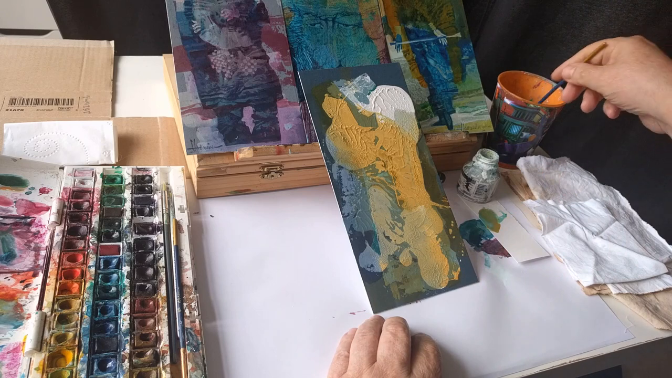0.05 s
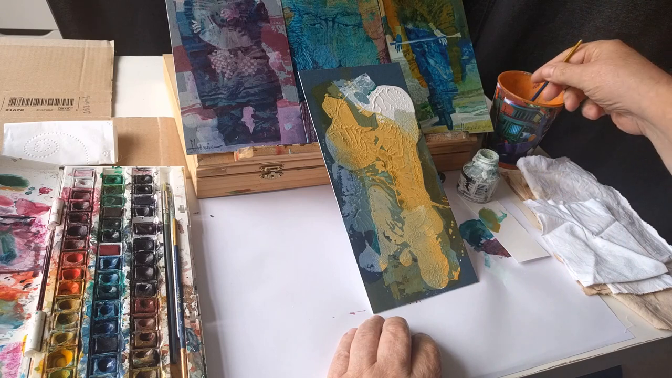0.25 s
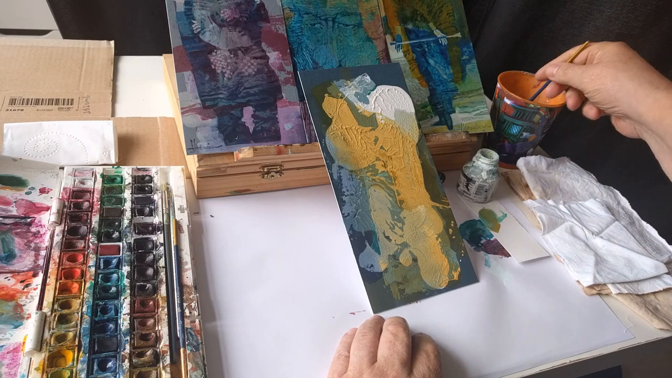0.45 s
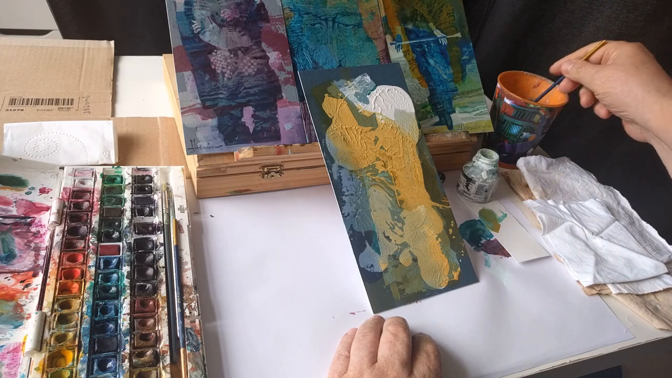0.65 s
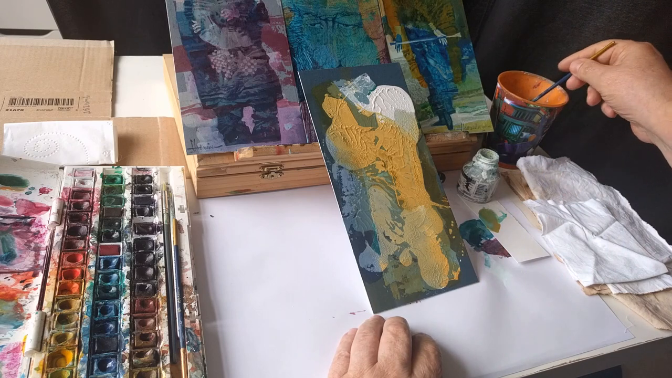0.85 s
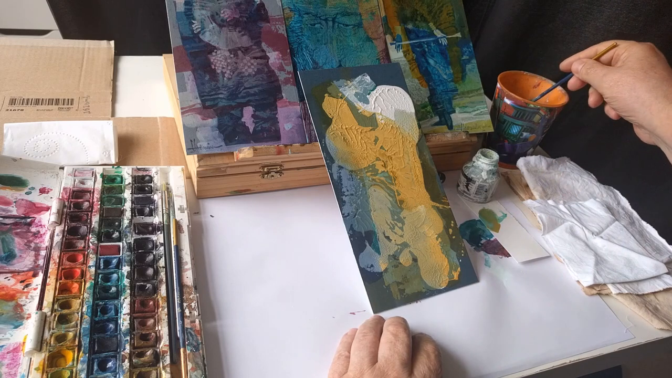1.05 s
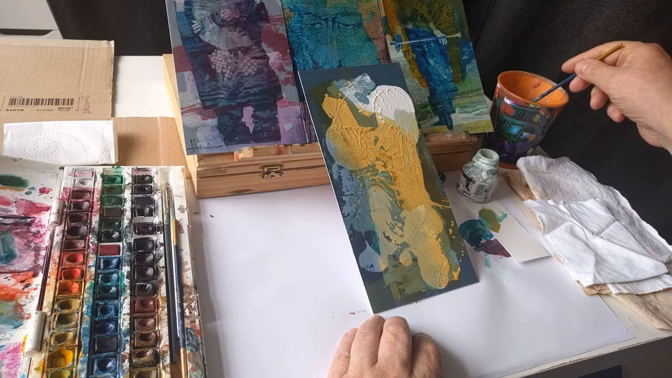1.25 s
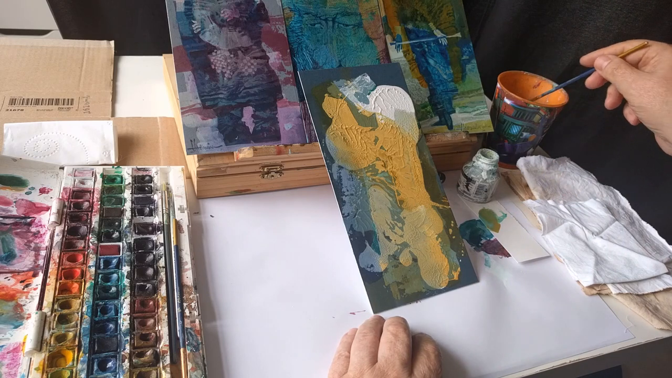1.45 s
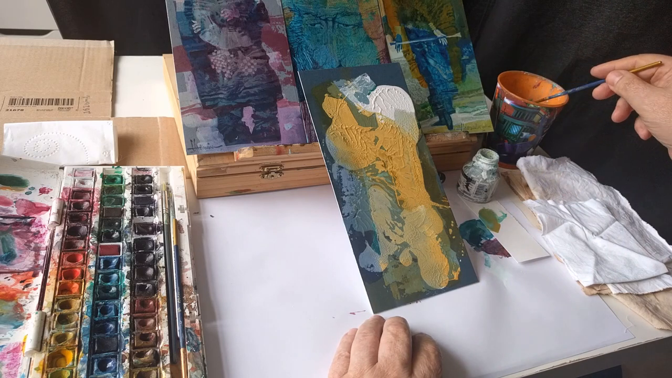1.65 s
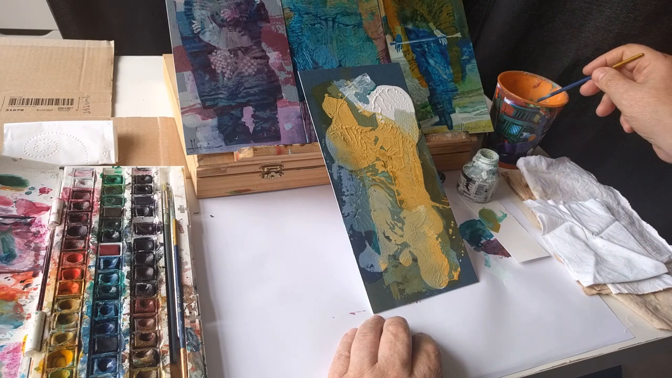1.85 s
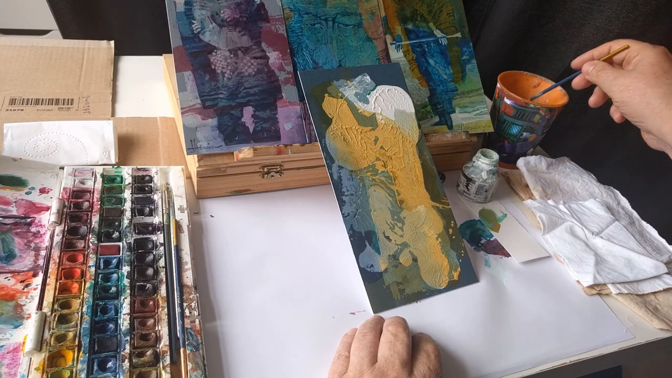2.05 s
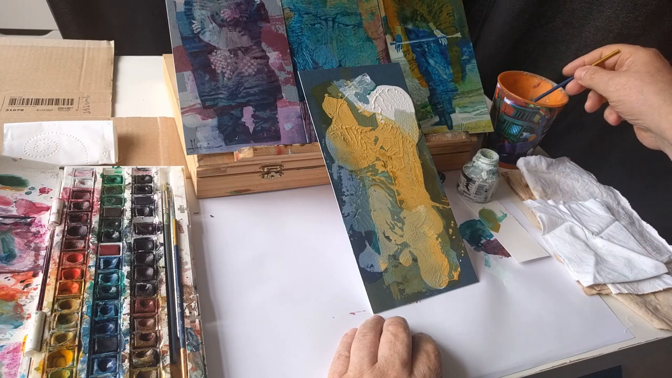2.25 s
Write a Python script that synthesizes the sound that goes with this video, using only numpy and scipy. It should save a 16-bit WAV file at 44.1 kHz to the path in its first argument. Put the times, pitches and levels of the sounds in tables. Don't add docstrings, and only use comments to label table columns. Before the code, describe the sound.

Close phone microphone in a small, reflective room: the brush's metal collar clinks the cup three times, then stirring brings plops, drips, fine fizz and faint knocks, over soft hiss and low hum.

```python
import sys
import numpy as np
from scipy import signal
from scipy.io import wavfile
from scipy.ndimage import uniform_filter1d

SR = 44100
rng = np.random.default_rng(int(sys.argv[2]) if len(sys.argv) > 2 else 0)


def dump_mix(stems):
    frames = np.atleast_2d(stems).T
    limited = np.clip(frames, -1, 1)
    pcm = np.round(limited * 32767).astype(np.int16)
    wavfile.write(sys.argv[1], SR, pcm)


def invert_db(level):
    return 10 ** (np.asarray(level, dtype=float) / 20)


N = 101430
SHELF_HZ = 15850


def evened(x):
    return x / np.sqrt(np.mean(x ** 2) + 1e-20)


def read(points, hz):
    f, value = np.transpose(points)
    return np.interp(np.log(hz + 1), np.log(f + 1), value)


def add(mix, s, sound):
    part = mix[round(s * SR):][:len(sound)]
    part += sound[:len(part)]


def resonate(x, hz, width_hz):
    turn = np.exp(2j * np.pi * hz * np.arange(len(x)) / SR)
    r = np.exp(-np.pi * width_hz / SR)
    return 2 * (turn * signal.lfilter([1 - r], [1, -r], x / turn)).real


def resonate_twice(x, hz, width_hz):
    return resonate(resonate(x, hz, width_hz), hz, width_hz)


def puff(noise, hz, width_hz, fall_s):
    u = np.arange(len(noise)) / SR / fall_s
    x = resonate_twice(noise * np.sqrt(u) * np.exp(-u), hz, width_hz)
    return x / abs(x).max()


def ring(modes, cycles, soft_s=.0001):
    longest_s = .03
    t = np.arange(round(longest_s * SR)) / SR
    x = np.zeros(len(t))
    for hz, db, t60 in modes:
        t60_s = min(t60, cycles / hz)
        x += invert_db(db - 60 * t / t60_s) * np.sin(2 * np.pi * hz * t)
    x = x * (1 - np.exp(-t / soft_s)) * np.cos(np.pi / 2 * t / longest_s)
    return x / abs(x).max()


def bubble(hz, t60_s, swell_s):
    rise_per_s = 4.8
    t = np.arange(round(t60_s * SR)) / SR
    tone = np.sin(2 * np.pi * hz * (t + rise_per_s * t ** 2 / 2))
    x = invert_db(-60 * t / t60_s) * (1 - np.exp(-t / swell_s)) * tone
    return x / abs(x).max()


def hiss():
    # f/Hz, density/dB
    hiss_colour = [(25, -62), (90, 11.5), (200, 7.5), (500, 1.5), (1500, -7.5), (4000, -8.5), (11000, -9),
                   (15500, -9.5)]
    level_db, patch_db = -63.5, 2
    frames, hz = N // 256 + 5, np.fft.rfftfreq(1024, 1 / SR)
    a, b, patches = rng.standard_normal((frames, 513, 3)).T
    patches = uniform_filter1d(patches, size=12, axis=0)
    patches = evened(uniform_filter1d(patches, size=10, axis=1))
    gain = invert_db(read(hiss_colour, hz)[:, None] + patch_db * patches)
    z = (a + 1j * b) * gain * (hz < SHELF_HZ)[:, None]
    x = signal.istft(z, nperseg=1024, noverlap=768)[1][:N]
    return invert_db(level_db) * evened(x)


def hum():
    hum_hz, width_hz, level_db, steady_share = 58, 24, -63.5, 0.85
    fuzz, wander = rng.standard_normal((2, 2 * N))
    fuzz = evened(resonate_twice(fuzz, hum_hz, width_hz)[N:])
    wander = uniform_filter1d(uniform_filter1d(wander, size=3000), size=3000)
    wander_hz = 4.19 * evened(wander[N:])
    steady = np.sqrt(2) * np.sin(2 * np.pi * np.cumsum(hum_hz + wander_hz) / SR)
    return invert_db(level_db) * (steady_share * steady + (1 - steady_share) * fuzz)


def whines():
    # f/Hz, level/dB
    tones = [(8000, -88), (9000, -85)]
    t = np.arange(N) / SR
    return sum(invert_db(db) * np.sin(2 * np.pi * f * t) for f, db in tones)


def fizz():
    # t/s, level/dB
    effort = [(0, -6), (.2, -6.5), (.6, -13), (.75, -1.5), (.9, -3.5), (1.1, 2.5), (1.398, 0), (1.5, -16.5),
              (1.949, -21), (2.05, -5), (2.3, -13)]
    rate_per_s, level_db, spread_db = 550, -69.5, 3.5
    size = invert_db(spread_db * np.minimum(rng.exponential(1, N), 4))
    size = size * (rng.random(N) < rate_per_s / SR)
    size = size * invert_db(level_db + np.interp(np.arange(N) / SR, *np.transpose(effort)))
    kind, pitches_hz = rng.integers(0, 24, N), np.geomspace(1370, 6000, num=24)
    out = np.zeros(N)
    for k, hz in enumerate(pitches_hz):
        out += signal.oaconvolve(size * (kind == k), bubble(hz, 32 / hz, swell_s=0.000098))[:N]
    return out


def drips():
    # t/s, peak level/dB, f/Hz
    drops = [(0.0957, -51.5, 2630), (0.187, -46.5, 3580), (0.7444, -50.5, 2970), (0.767, -50.5, 2890),
             (0.884, -55, 4120), (0.96, -54.5, 3470), (0.9994, -47.5, 3040), (1.013, -55, 3300),
             (1.0737, -38.5, 3050), (1.0802, -38.5, 2860), (1.1486, -39.5, 3430), (1.1722, -45.5, 3240),
             (1.2408, -41.5, 3010), (1.256, -57, 4000), (1.2618, -48, 2984), (1.3409, -48, 4730),
             (1.3524, -45, 3450), (1.3931, -47, 3030), (1.7966, -53, 4200), (2.0044, -54, 4530),
             (2.0752, -48.5, 4530), (2.1439, -48.5, 3000), (2.146, -53, 4200), (2.2355, -46, 3600),
             (2.241, -51, 3410), (2.258, -48, 3000)]
    out, level_db = np.zeros(N), -6.5
    for s, db, hz in drops:
        add(out, s, invert_db(db + level_db) * bubble(hz, t60_s=0.013, swell_s=.0005))
    return out


def ticks():
    # t/s, peak level/dB, f/Hz
    bursts = [(0.097, -55.5, 4700), (0.19, -62, 6000), (0.2295, -52, 11500), (0.335, -63, 8700),
              (0.415, -49.5, 8670), (0.4245, -49, 9000), (0.4246, -52, 13000), (0.6965, -58.5, 7600),
              (0.7183, -46.5, 9740), (0.744, -58, 9400), (0.8222, -46, 10170), (0.829, -51, 9900),
              (0.849, -50.5, 5900), (0.864, -56, 8700), (0.877, -53, 5000), (0.884, -49, 6600),
              (0.884, -52, 10200), (0.891, -49, 5200), (0.893, -51, 6800), (1.0103, -50, 5600),
              (1.074, -49, 6500), (1.225, -54, 14950), (1.2402, -47.5, 6000), (1.1, -55.5, 8800),
              (1.345, -57.5, 8700), (1.3934, -51, 6000), (1.575, -53, 5530), (1.6044, -53, 6500),
              (2.009, -58, 6800), (2.018, -63, 8800), (2.0252, -50.5, 6500), (2.0254, -57, 10200),
              (2.0266, -57, 14700), (2.058, -59, 8800), (2.0583, -59, 11500), (2.069, -58, 8900),
              (2.0707, -48.5, 5900), (2.081, -57, 6600), (2.143, -58, 8970), (2.2028, -52.5, 9460),
              (2.222, -53, 4900), (1.9, -52, 4750), (2.242, -52, 4900), (2.292, -55, 10300)]
    out, level_db = np.zeros(N), 1.5
    for s, db, hz in bursts:
        noise = rng.standard_normal(800)
        add(out, s, invert_db(db + level_db) * puff(noise, hz, width_hz=1150, fall_s=0.00069))
    return out


def bubbles():
    # t/s, peak level/dB, f/Hz, t60/s
    large = [(0.178, -55.5, 1880, 0.0128), (0.465, -56, 1627, 0.15), (0.697, -47.5, 1413, 0.036),
             (0.727, -44, 1530, 0.0058), (0.879, -44.5, 1440, 0.017), (0.885, -46, 1455, 0.019),
             (0.917, -39.5, 1380, 0.017), (0.923, -38.5, 1240, 0.028), (1.05, -44.5, 1413, 0.036),
             (1.072, -37, 1415, 0.018), (1.087, -36.5, 1151, 0.038), (1.201, -50.5, 844, 0.017),
             (1.239, -51, 1585, 0.052), (1.256, -35.5, 1336, 0.031), (1.262, -35, 1260, 0.029),
             (1.375, -48.5, 1750, 0.015), (2.004, -54.5, 2170, 0.0105), (2.113, -57, 1190, 0.046),
             (2.1828, -45.5, 852, 0.039), (2.218, -38.5, 1475, 0.023)]
    # t/s, peak level/dB, f/Hz, t60/s
    further_tones = [(0.319, -49.5, 990, 0.015), (0.321, -50.5, 384, 0.025), (0.343, -46, 1504, 0.021),
                     (0.497, -52, 644, 0.032), (0.4975, -36, 1990, 0.033), (0.697, -49, 847, 0.024),
                     (0.73, -52.5, 1650, 0.024), (0.877, -51.5, 1920, 0.022), (0.885, -53, 2230, 0.034),
                     (1.05, -61.5, 1940, 0.018), (1.072, -46, 1800, 0.02), (1.078, -47, 1280, 0.032),
                     (1.080, -53.5, 820, 0.049), (1.083, -39, 1430, .02), (1.132, -47, 1280, 0.013),
                     (1.136, -47, 1110, 0.028), (1.256, -43, 2090, 0.014), (2.218, -45, 1936, 0.021),
                     (2.226, -41, 1190, 0.017), (2.247, -58, 1185, 0.014), (2.252, -50, 2020, .015),
                     (2.264, -48.5, 1610, 0.031), (2.275, -47.5, 1150, 0.023)]
    out, level_db, splash_db = np.zeros(N), -2.5, -8.5
    for s, db, hz, t60_s in large + further_tones:
        splash = puff(rng.standard_normal(6000), 1.02 * hz, 0.94 * hz, fall_s=0.0052)
        add(out, s, invert_db(db + level_db) * bubble(hz, t60_s, swell_s=0.0014))
        add(out, s, invert_db(db + level_db + splash_db) * splash)
    return out


def clinks():
    # t/s, peak level/dB, rebound delay/s, rebound level/dB, level into room/dB
    hits = [
        (0.2315, -17.5, .0011, -7, -3),
        (0.3425, -26, 0.00083, 4, 0),
        (0.4964, -14, 0.0016, -40, 0.5),
    ]
    # f/Hz, level/dB, t60/s
    spots = [
        [(870, -20, 0.016), (1488, -26, .03), (3330, -10, .014), (4430, -8.5, .011), (6020, -2.5, 0.013),
         (6600, -1.5, 0.0086), (7940, -8, .006), (8820, -6, .006), (9547, -2, .006), (10900, -9.5, .006),
         (13860, -11, 0.0038), (15300, -11.5, .003)],
        [(3020, -4, 0.013), (6280, 4.5, 0.0099), (6660, 5, 0.0066), (7080, -7, .005), (8320, 7, .005),
         (9030, 5, 0.0058), (9460, 1.5, 0.0031), (11500, -25, .006), (14200, 3, .004)],
        [(1980, -18, .03), (3300, -15, 0.016), (3800, -10, 0.0094), (4050, -14, 0.02), (5870, -4.5, .01),
         (7600, -11, .008), (8800, -2, 0.0036), (9560, -1.5, 0.0046), (10640, -1.5, .007), (12240, -9, .004),
         (14700, -22, 0.0034), (15600, -3.5, .004)],
    ]
    # f/Hz, level/dB, t60/s
    away_modes = [
        [(1360, -25, 0.019), (3240, -17.5, 0.014), (6000, -18, 0.0036), (7550, -16, .008), (7920, -14, 0.0064)],
        [(1320, -16.5, 0.013), (6800, -20, 0.015), (7000, -6, .012), (10430, -10, .008)],
        [(1990, -36, 0.018), (3560, -14.5, 0.017), (5580, -9.5, 0.013), (5900, -12, 0.01), (7850, -14, 0.005),
         (9150, -14, 0.0028)],
    ]
    level_db, crack_s = -3, .00012
    direct, sideways = np.zeros((2, N))
    click = np.exp(-np.arange(400) / SR / crack_s)
    crack = invert_db(-4.5) * puff(np.diff(click, prepend=0), hz=6500, width_hz=5100, fall_s=crack_s)
    for (s, db, after_s, again_db, room_db), modes, away in zip(hits, spots, away_modes):
        hit_db = db + level_db
        sound = invert_db(hit_db) * ring(modes, cycles=42)
        add(direct, s, sound)
        add(direct, s + after_s, invert_db(again_db) * sound)
        add(direct, s, invert_db(hit_db) * crack)
        add(sideways, s, invert_db(hit_db + room_db + 4) * ring(modes, cycles=22))
        add(sideways, s, invert_db(hit_db + room_db + 6) * crack)
        for hz, away_db, t60_s in away:
            add(sideways, s, invert_db(db + away_db) * ring([(hz, 0, t60_s)], cycles=120))
    return np.stack([direct, sideways])


def knocks():
    # t/s, peak level/dB
    bumps = [(0.233, -52.5), (0.343, -43.5), (0.492, -58), (0.692, -51), (0.874, -48), (0.915, -54),
             (1.045, -44.5), (1.079, -56), (1.205, -52.5), (1.231, -51.5), (1.255, -54.5), (2.02, -63.5),
             (2.101, -58.5), (2.212, -47)]
    out, level_db = np.zeros(N), -10
    for s, db in bumps:
        noise = rng.standard_normal(6000)
        thud = sum(puff(noise, hz, width_hz=130, fall_s=.02) for hz in (235, 409))
        add(out, s, invert_db(db + level_db) * thud)
    return out


def room(x):
    # delay/s, level/dB
    near_walls = [(.0066, -18), (.0074, -18), (.0082, -22), (.0091, -14), (.0101, -19)]
    # delay/s, level/dB
    far_walls = [(.0195, -7), (.0245, -11), (.035, -9)]
    # f/Hz, t60/s
    decay = [(200, 0.249), (600, 0.1), (1400, 0.45), (3500, 0.302), (6000, 0.357), (9000, 0.225),
             (11500, .2), (15000, .17)]
    # f/Hz, level/dB
    tail_colour = [(200, 12), (1500, -0.5), (5500, -0.5), (9000, -2.5), (12000, 6), (15000, 10.5)]
    tabletop_s, tabletop_db, room_start_s, room_db = .002, -12, 0.0092, -6
    dull_hz, low_wait_s, low_wait_db = 2000, .018, -9
    near_wall_bass = .35

    taps = np.zeros(SR // 2)
    at = np.arange(round(tabletop_s * SR), SR // 2 - 12, 12)
    signs = rng.choice([-1., 1.], len(at))
    taps[at + rng.integers(0, 12, len(at))] = signs * invert_db(tabletop_db * (at < room_start_s * SR))

    hz, t, z = signal.stft(taps, SR, nperseg=128)
    z = z * (hz < SHELF_HZ - 200)[:, None]
    z = z * invert_db(low_wait_db * (hz < dull_hz)[:, None] * (t < low_wait_s))
    z = z * invert_db(read(tail_colour, hz)[:, None] - 60 * t / read(decay, hz)[:, None])
    tail = signal.istft(z, SR, nperseg=128)[1]
    tail = invert_db(room_db) * tail / np.linalg.norm(tail)

    dull = signal.firwin(63, dull_hz, fs=SR)
    for s, db in near_walls:
        add(tail, s, np.array([invert_db(db)]))
        add(tail, s - 31 / SR, invert_db(db) * (near_wall_bass - 1) * dull)
    for s, db in far_walls:
        add(tail, s, invert_db(db) * dull)
    return signal.fftconvolve(x, tail)[:N]


def scene():
    air = hiss() + hum() + whines()
    water = fizz() + drips() + ticks() + bubbles() + knocks()
    direct, sideways = clinks() + water
    return (direct + room(sideways) + air)[None]


def low_pass(x):
    return signal.sosfilt(signal.butter(12, 17010, fs=SR, output="sos"), x)


def record(dry):
    port_hz, port_width_hz, port_db = 8447, 2100, 11
    shelf_db, edge_hz, offset = -12, 16950, -.0009
    x = dry[0] + invert_db(port_db) * resonate_twice(dry[0], port_hz, port_width_hz)
    low, full = (signal.firwin(511, hz, window=("kaiser", 9), fs=SR) for hz in (SHELF_HZ, edge_hz))
    x = signal.oaconvolve(x, low + invert_db(shelf_db) * (full - low), "same") + offset
    return low_pass(x[None])


dry = scene()
out = record(dry)
dump_mix(out)
```